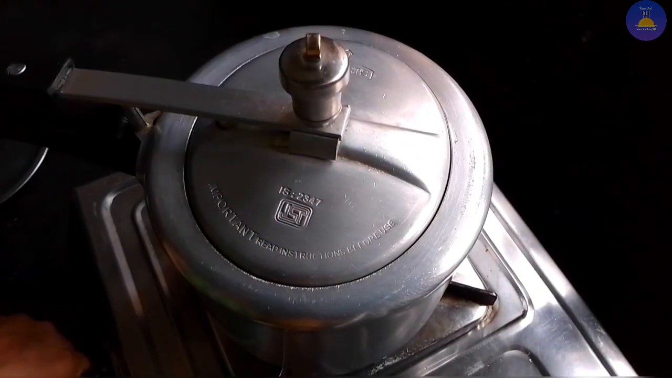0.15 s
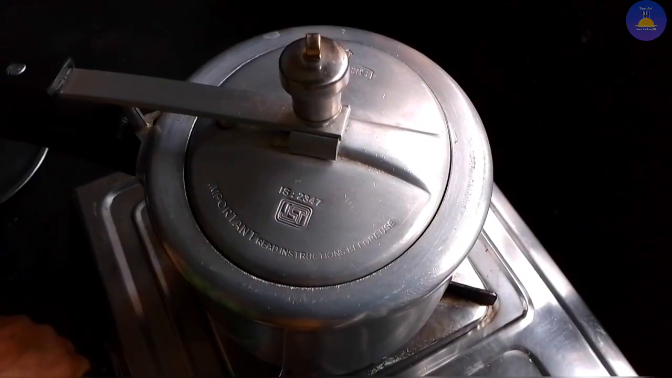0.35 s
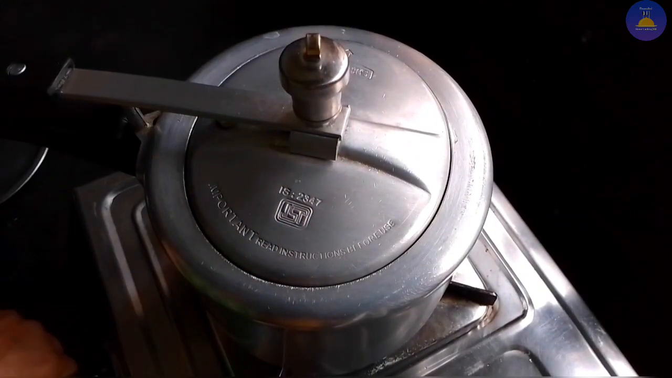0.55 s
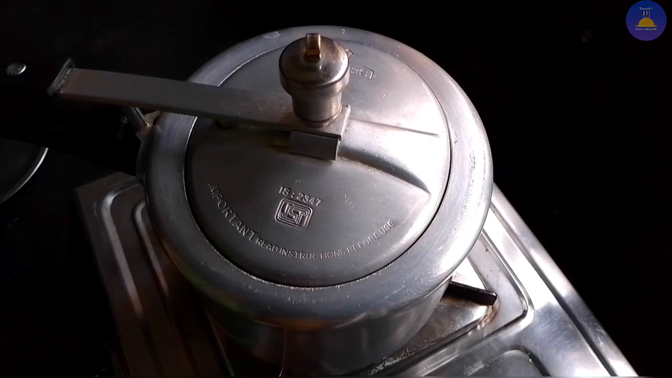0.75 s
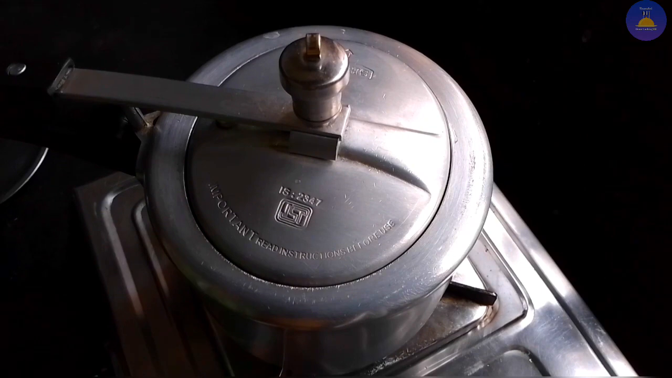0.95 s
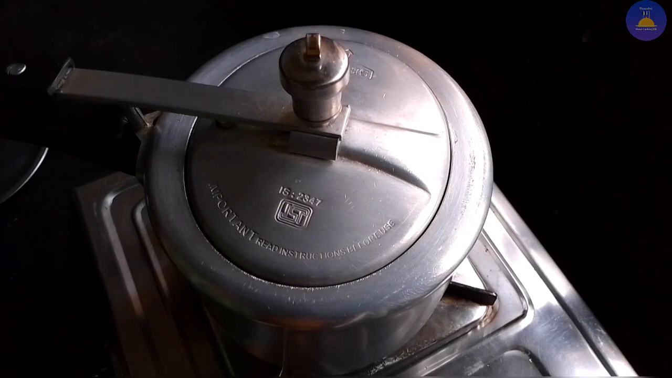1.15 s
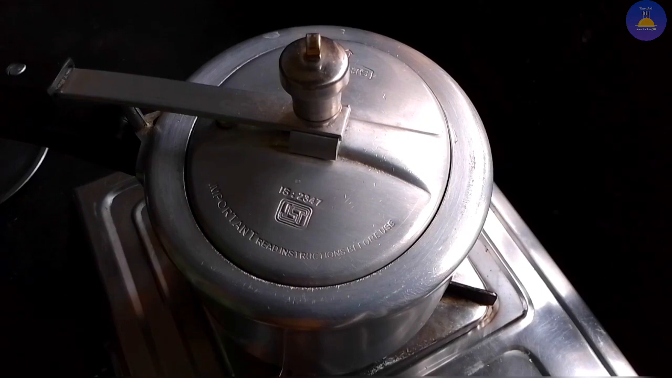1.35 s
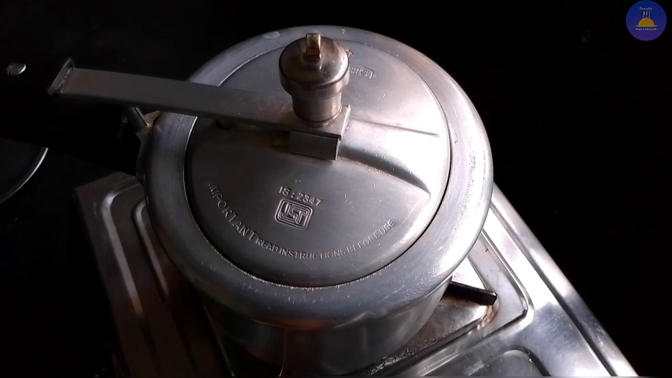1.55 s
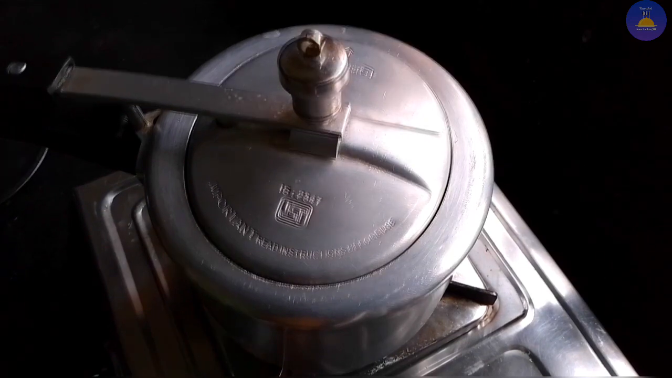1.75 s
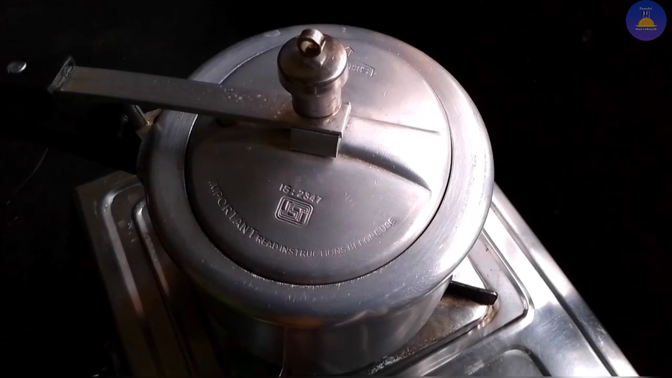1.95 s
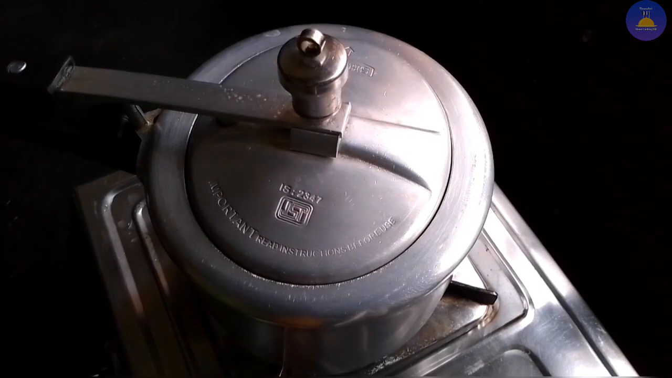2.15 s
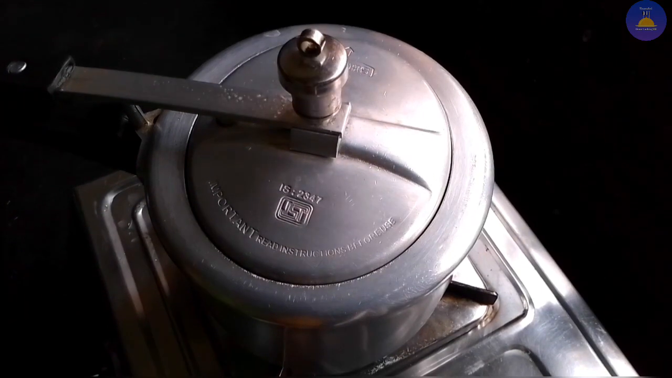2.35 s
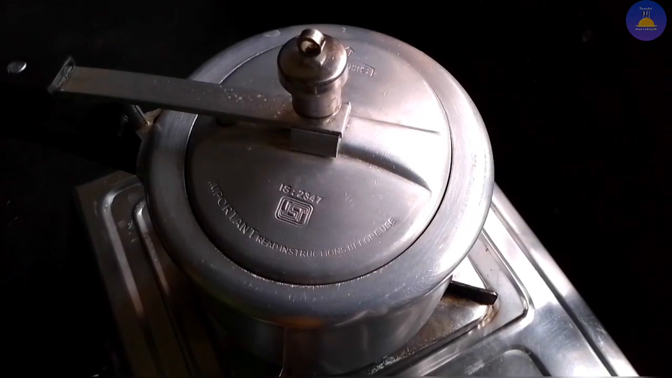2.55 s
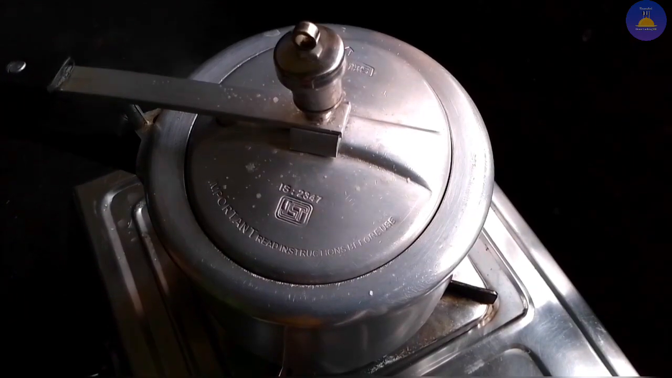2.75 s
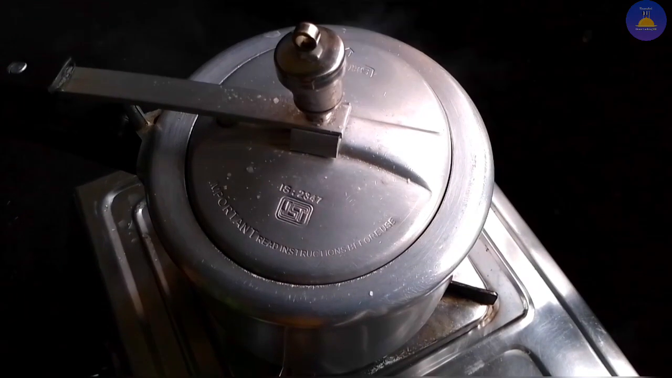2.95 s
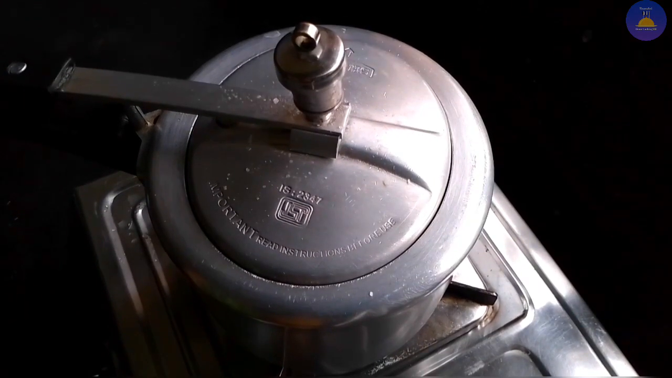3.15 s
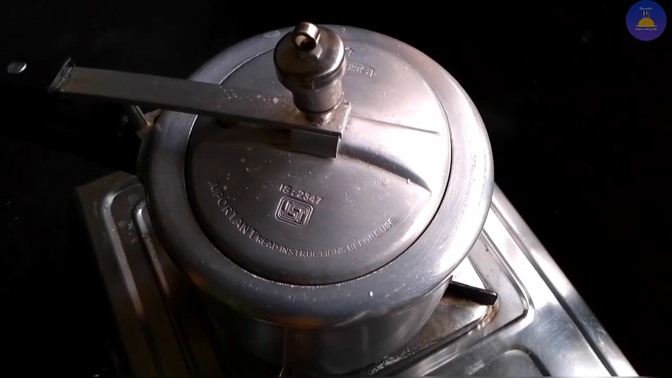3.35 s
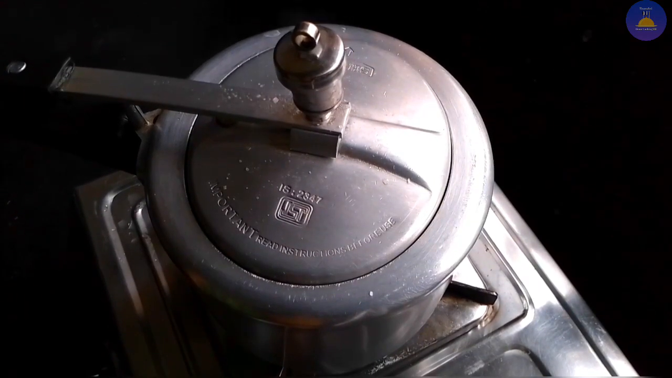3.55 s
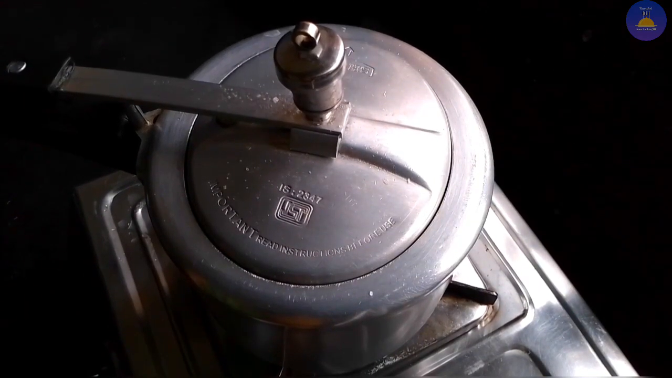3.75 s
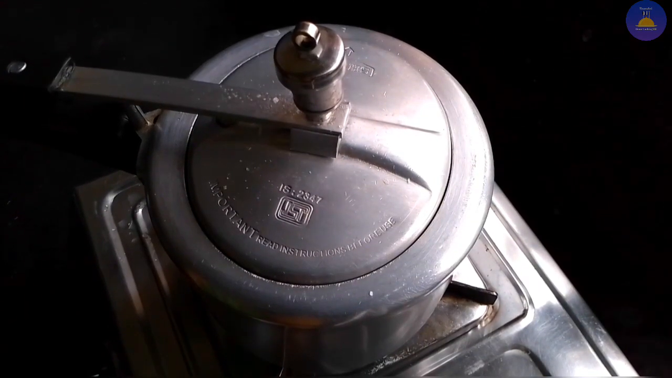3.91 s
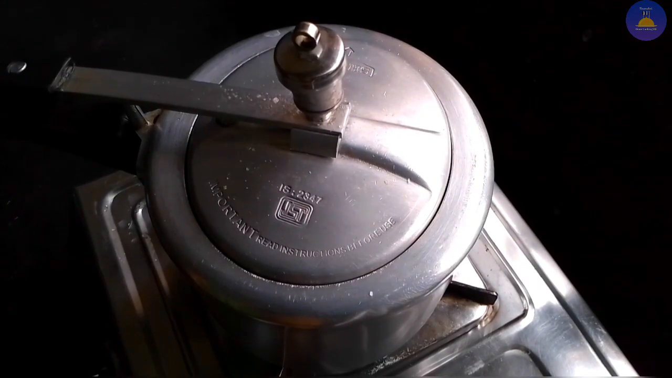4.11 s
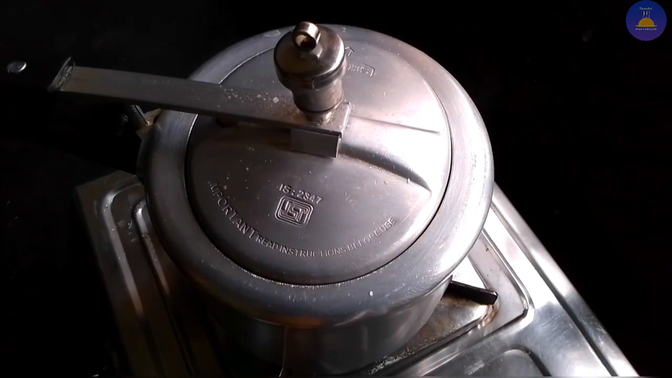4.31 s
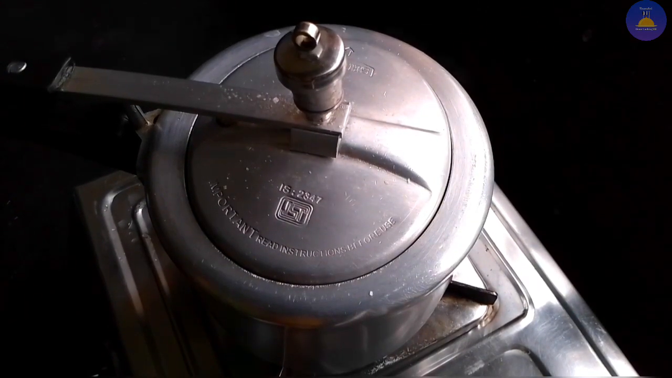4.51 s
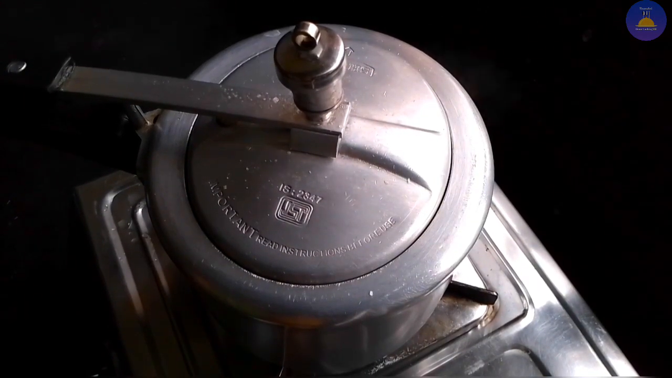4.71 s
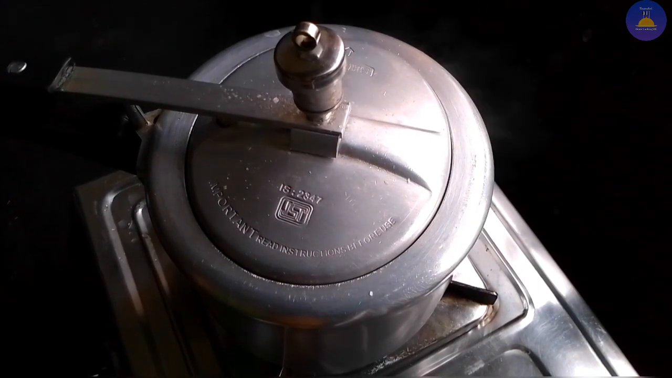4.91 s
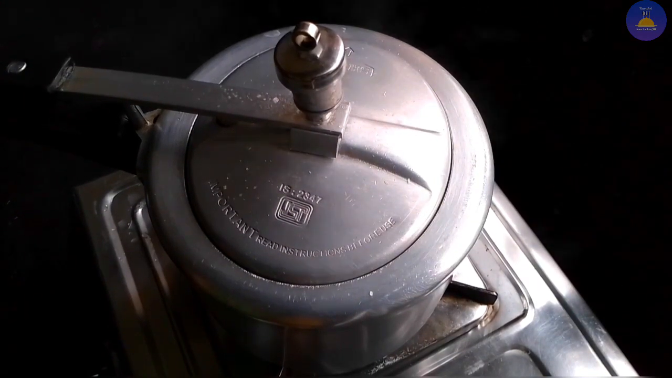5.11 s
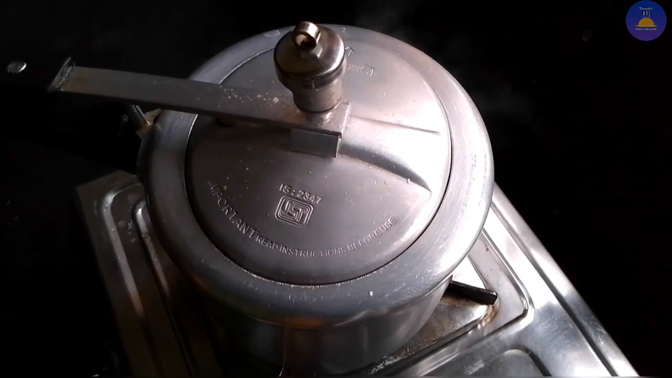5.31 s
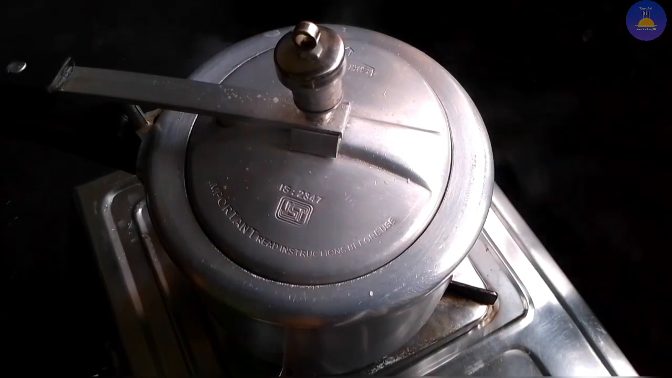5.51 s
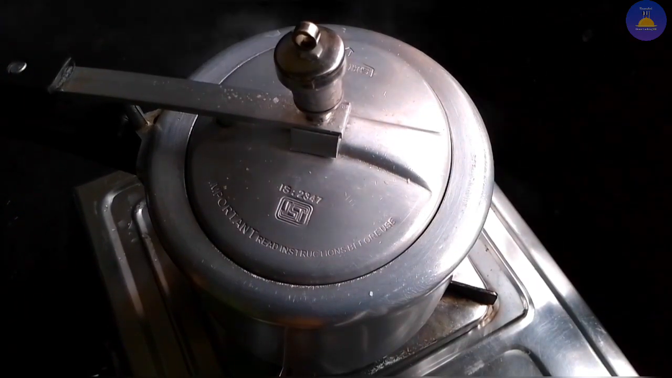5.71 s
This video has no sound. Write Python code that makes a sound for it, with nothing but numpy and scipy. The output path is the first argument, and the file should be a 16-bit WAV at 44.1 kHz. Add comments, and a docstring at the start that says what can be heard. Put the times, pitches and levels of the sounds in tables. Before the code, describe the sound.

A stovetop pressure cooker vents through its weighted valve. The start is almost silent, with only low burner noise and barely audible hum. A jet of steam fades in smoothly and becomes extremely loud, dominated by piercing high treble and distorted by the overloaded microphone. A duller airy rush sits underneath, weakening a little midway and pulsing several times. Short room reflections blend into the noise; both ears hear the same sound.

```python
"""A pressure cooker on a gas stove blows off through its weighted valve in a small kitchen. At first only the
burner murmurs (shaped noise) with a faint hum (wavering sines). From 1.26 s the sound of the steam jet, already
at full force, fades in evenly over a second: a shrill hiss near 9.5 kHz, noise so loud that it overloads the
microphone, over a soft rush of broader noise. The jet slowly eases as the pot loses pressure and surges briefly
at 2.8 s. Near 3.7 s the weight settles and the jet drops, then three more brief surges follow."""
import sys
import numpy as np
from scipy import signal
from scipy.fft import rfft, irfft, next_fast_len
from scipy.io import wavfile

SR = 44100
rng = np.random.default_rng(int(sys.argv[2]) if len(sys.argv) > 2 else 0)


def pcm_store(signal):
    """Save signal as 16-bit PCM."""
    levels = np.round(np.clip(np.atleast_2d(signal), -1, 1) * 32767)
    wavfile.write(sys.argv[1], SR, levels.astype(np.int16).T)


N = 258898   # length in samples

# Tone colour of the gas burner and room. Each row: frequency in Hz, relative level in dB per Hz.
BURNER_SPECTRUM = [(20, -16), (60, -21), (130, -17), (170, -25), (250, -7.5), (310, -9.5), (400, -4.5),
                   (530, -5), (700, -7), (1100, -14.5), (2000, -22), (4000, -26.5), (15000, -28)]
# Resonances of the space under the pot. Each row: centre in Hz, width at half the lift in Hz, lift in dB.
BURNER_RESONANCES = [(405, 45, 5.5), (535, 40, 6), (1348, 90, 4)]
# Faint hum in the kitchen. Each row: frequency in Hz, rms level in dB.
HUM_TONES = [(97, -91), (243, -85), (409, -88), (544, -85)]
# Tone colour of the jet's soft rush. Each row: frequency in Hz, relative level in dB per Hz.
RUSH_SPECTRUM = [(20, -9.5), (85, -7), (140, -4.5), (210, 0), (400, -1.5), (1300, -3), (2500, -1.2),
                 (4000, -1), (8000, -11)]
# Tone colour of the valve slot's hiss before overload. Each row: frequency in Hz, relative level in dB per Hz.
HISS_SPECTRUM = [(2500, -34), (4200, -20.5), (5600, -18), (7000, -11.5), (7700, -8), (8400, -3),
                 (9300, -0.5), (10200, -.5), (11000, -3.5), (11900, -11), (14000, -14.5), (15400, -16.5)]
# Narrow peaks and hollows in the hiss's tone colour. Each row: centre in Hz, width at half the lift in Hz,
# lift in dB (negative makes a hollow).
HISS_PEAKS_AND_HOLLOWS = [(4500, 250, -3), (5105, 76, 5.5), (6012, 66, 8), (6200, 45, 2.5), (6620, 47, 7),
                          (7060, 40, 8.5), (7587, 40, 3), (8110, 55, 4), (8680, 42, 5.5), (9000, 60, -0.5),
                          (9226, 40, 5.5), (9330, 49, 4.5), (10000, 37, 6), (10440, 56, 3.5),
                          (10800, 75, -3.5), (10950, 65, -0.5)]
# Brief surges as the weight rocks on the vent. Each row: time of the top in seconds, lift in dB.
WEIGHT_SURGES = [(2.8, 1.5), (4.11, 3.5), (4.49, 2.0), (5.01, 2.5)]

BURNER_DB = -69.5   # average level of the flame
SWELL_START_S, SWELL_END_S = 1.26, 2.263   # the steam fades in between these times
JET_DB, SAG_DB_PER_S = -30.5, 0.58   # starting strength of the jet, and how fast it eases
SETTLE_S, SETTLE_LENGTH_S, SETTLE_DROP_DB = 3.68, 0.09, 3.5   # the weight settles and throttles the jet
SURGE_WIDTH_S = 0.088   # from the top of a surge down to about a third of its lift
RUSH_DB = 2   # added to the jet strength
HISS_DB = -5   # at average jet strength, before overload
HISS_PER_RUSH = 0.4   # dB of hiss for each dB of jet strength
OVERLOAD, MIC_LOW_HZ = 0.57, 170   # largest peak before flattening; bass cut of the microphone
CUTOFF_HZ = 15470   # top of the passed treble
DRIFT_STEP = 40   # samples from one point of a slow drift to the next


def from_db(db):
    """Turn decibels into a gain."""
    return 10 ** (np.asarray(db) / 20)


def rms_one(x):
    """Scale a sound to an rms (average strength) of 1."""
    return x / np.sqrt(np.mean(x ** 2) + 1e-20)


def seconds():
    """Give the time of every sample."""
    return np.arange(N) / SR


def drift(rate_hz):
    """Wander slowly by chance: noise is smoothed twice by a one-pole low-pass and scaled to rms 1."""
    pole = np.exp(-2 * np.pi * rate_hz * DRIFT_STEP / SR)
    noise = rng.standard_normal(N // DRIFT_STEP + 2002)
    smoothed = signal.lfilter([1], [1, -2 * pole, pole * pole], noise)
    slow = rms_one(smoothed[2000:])   # skip the filter's start-up
    return np.interp(np.arange(N) / DRIFT_STEP, np.arange(len(slow)), slow)


def turbulence(spectrum, peaks=()):
    """Make the noise of tumbling gas: a broad spectrum with narrow peaks or hollows, at rms 1."""
    size = next_fast_len(N)
    hz = np.maximum(np.arange(size // 2 + 1) * SR / size, 1)
    points = np.array(spectrum)
    level_db = np.interp(np.log(hz), np.log(points[:, 0]), points[:, 1])
    for centre, width, lift_db in peaks:
        level_db = level_db + lift_db / (1 + (2 * (hz - centre) / width) ** 2)
    shaped = rfft(rng.standard_normal(size)) * from_db(level_db)
    return rms_one(irfft(shaped, size)[:N])


def kitchen(x, wet_db, t60):
    """Add dense echoes off lid, hob and walls that ripple the spectrum; the level stays about the same."""
    t = np.arange(SR // 4) / SR
    tail = rng.standard_normal(len(t)) * from_db(-60 * t / t60)   # falls 60 dB in t60 seconds
    echoes = signal.fftconvolve(x, tail / np.linalg.norm(tail))[:N]
    wet = from_db(wet_db)
    return (x + wet * echoes) / np.hypot(1, wet)


def burner():
    """The flame murmurs under the pot as unsteady noise, with faint hum tones whose phase wavers."""
    flame_db = BURNER_DB + 0.87 * drift(8)
    flame = turbulence(BURNER_SPECTRUM, BURNER_RESONANCES) * from_db(flame_db)
    hum = np.zeros(N)
    for hz, rms_db in HUM_TONES:
        phase = 2 * np.pi * hz * seconds() + 0.85 * drift(3)
        hum += np.sqrt(2) * from_db(rms_db) * np.sin(phase)   # a sine peaks at root 2 times its rms
    return flame + hum


def jet_flow():
    """Jet strength in dB: it sags with the pressure, surges as the weight rocks and drops as it settles."""
    t = seconds()
    sag_db = SAG_DB_PER_S * np.maximum(t - SWELL_START_S, 0)
    settled = np.clip((t - SETTLE_S) / SETTLE_LENGTH_S, 0, 1)
    surge_db = np.zeros(N)
    for top_s, lift_db in WEIGHT_SURGES:
        surge_db += lift_db * np.exp(-((t - top_s) / SURGE_WIDTH_S) ** 2)
    return JET_DB - sag_db - SETTLE_DROP_DB * settled + surge_db


def jet_rush(flow_db):
    """A soft, flat rush of broad noise spreads below the hiss, following the jet's strength."""
    flutter_db = 0.95 * drift(23)
    rush = kitchen(turbulence(RUSH_SPECTRUM), wet_db=-8, t60=0.32)
    return rush * from_db(RUSH_DB + flow_db + flutter_db)


def valve_hiss(flow_db):
    """Steam tears through the slot under the wobbling weight, louder with the flow."""
    wobble_db = 0.5 * drift(23)
    jet = kitchen(turbulence(HISS_SPECTRUM, HISS_PEAKS_AND_HOLLOWS), wet_db=-13, t60=0.23)
    flow_change_db = flow_db - flow_db.mean()
    return jet * from_db(HISS_DB + HISS_PER_RUSH * flow_change_db + wobble_db)


def overload(x):
    """The microphone flattens the peaks, which evens the hiss and smears it in pitch; it passes little bass."""
    fine = signal.resample_poly(x, 3, 1)   # clip at three times the sample rate to limit false tones
    flattened = signal.resample_poly(np.clip(fine, -OVERLOAD, OVERLOAD), 1, 3)
    bass_cut = signal.butter(2, MIC_LOW_HZ, "high", fs=SR, output="sos")
    return signal.sosfilt(bass_cut, flattened)


def scene():
    """The overloaded hiss and the rush fade in evenly over the burner, the same in both ears."""
    flow_db = jet_flow()
    swell = np.clip((seconds() - SWELL_START_S) / (SWELL_END_S - SWELL_START_S), 0, 1)
    steam = overload(valve_hiss(flow_db)) + jet_rush(flow_db)
    return np.tile(swell * steam + burner(), (2, 1))


def record(dry):
    """A steep low-pass filter cuts the top of the treble."""
    # 12th order, 0.1 dB ripple below the cutoff, 70 dB down above it
    treble_cut = signal.ellip(12, 0.1, 70, CUTOFF_HZ, fs=SR, output="sos")
    return signal.sosfilt(treble_cut, dry)


dry = scene()
out = record(dry)
pcm_store(out)
```